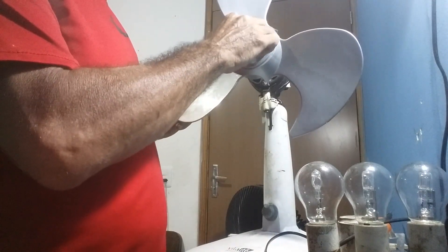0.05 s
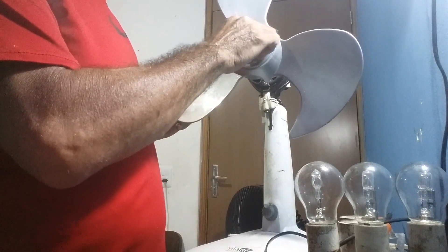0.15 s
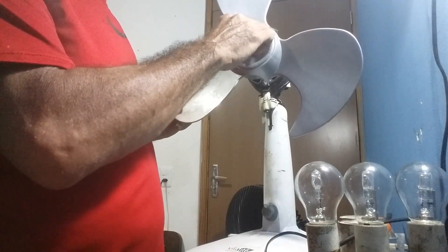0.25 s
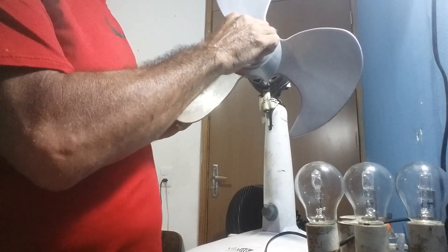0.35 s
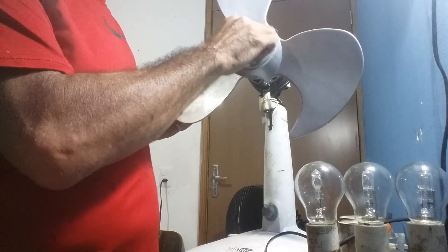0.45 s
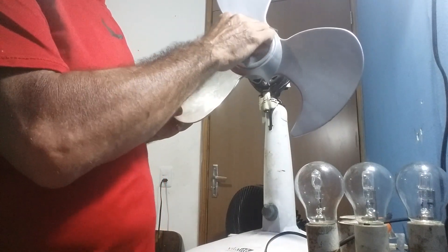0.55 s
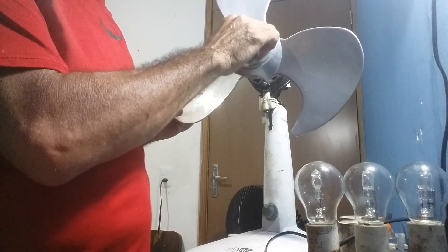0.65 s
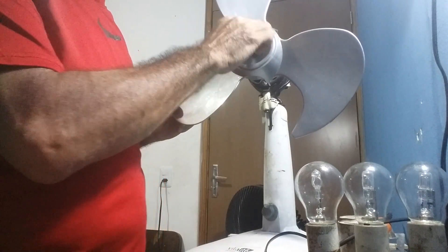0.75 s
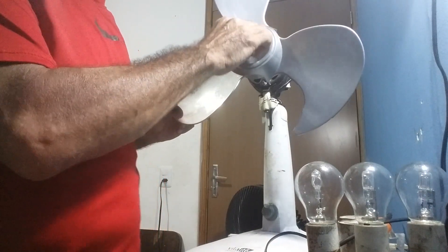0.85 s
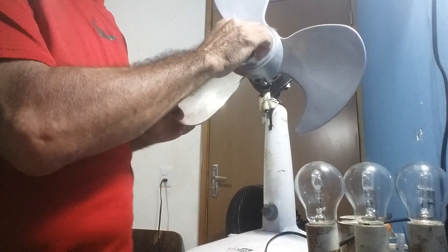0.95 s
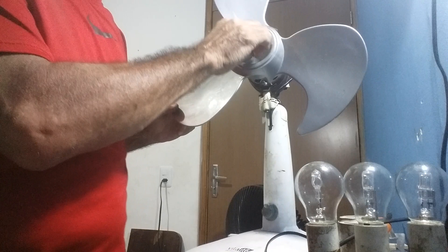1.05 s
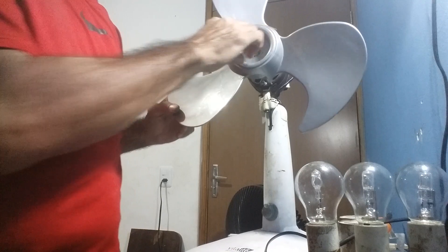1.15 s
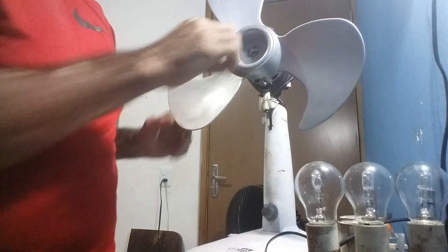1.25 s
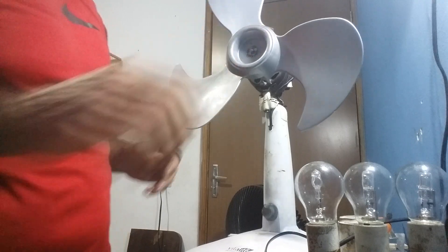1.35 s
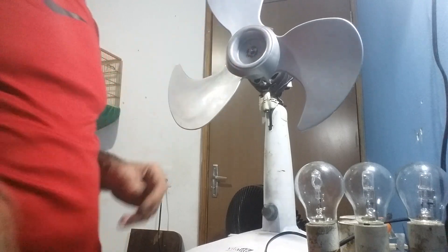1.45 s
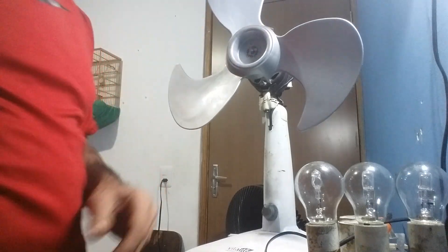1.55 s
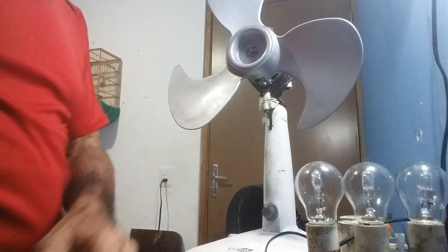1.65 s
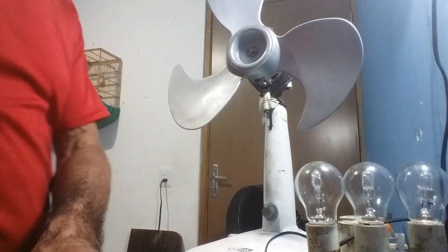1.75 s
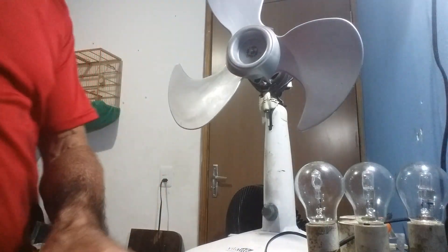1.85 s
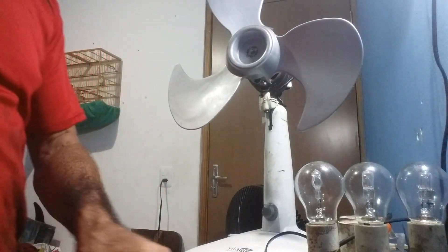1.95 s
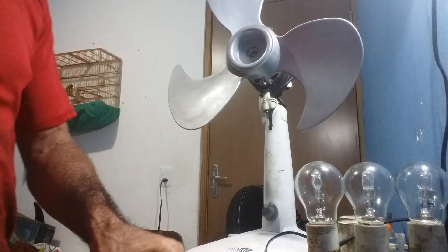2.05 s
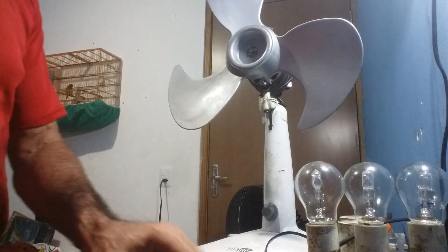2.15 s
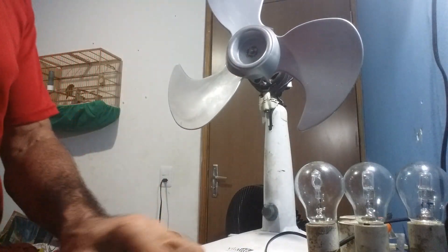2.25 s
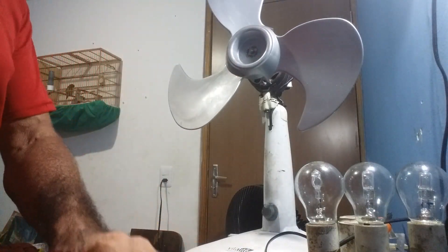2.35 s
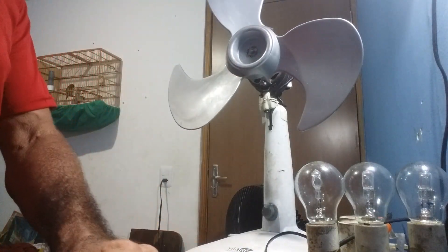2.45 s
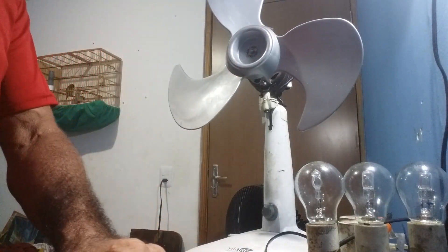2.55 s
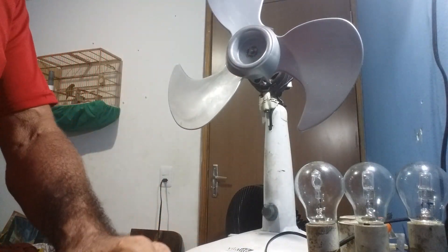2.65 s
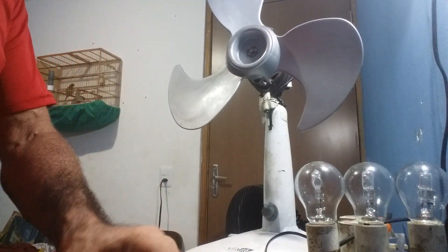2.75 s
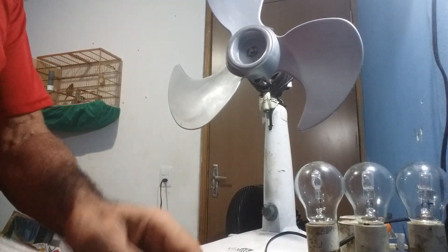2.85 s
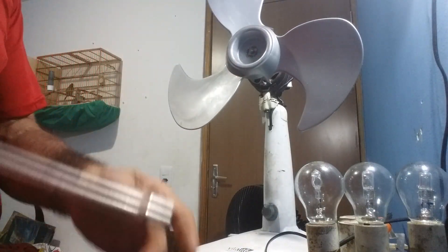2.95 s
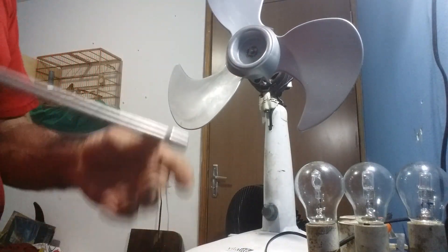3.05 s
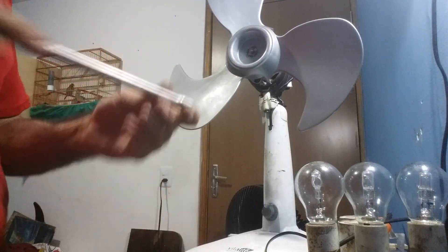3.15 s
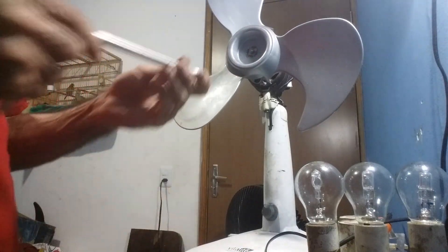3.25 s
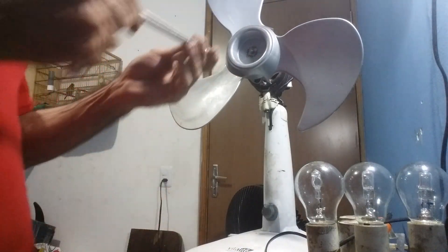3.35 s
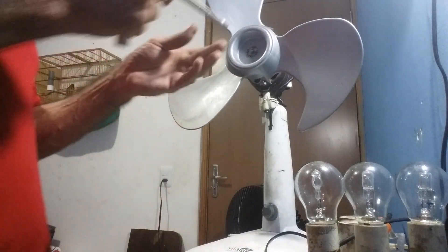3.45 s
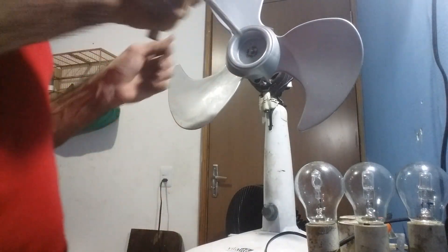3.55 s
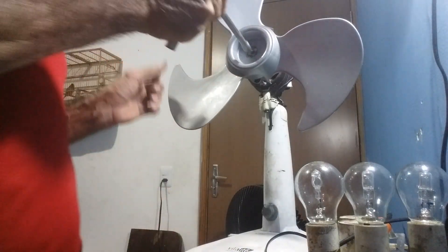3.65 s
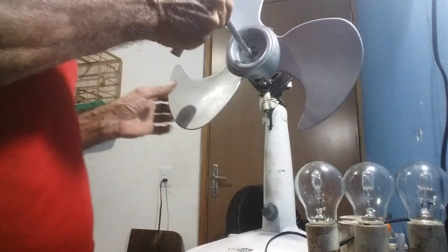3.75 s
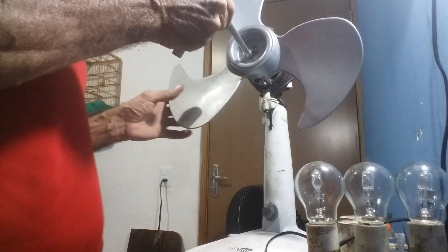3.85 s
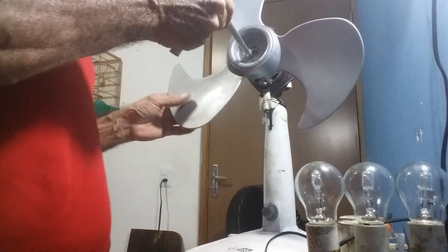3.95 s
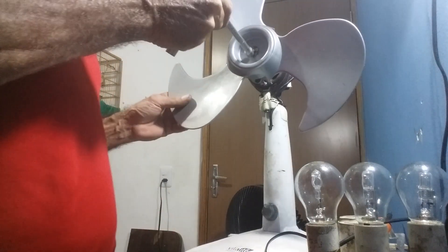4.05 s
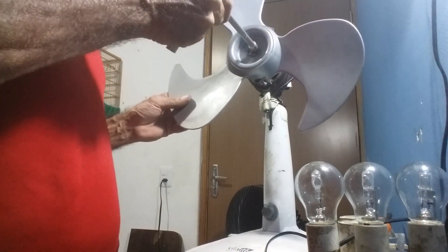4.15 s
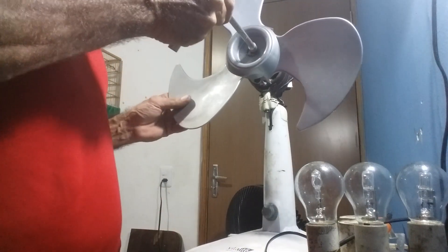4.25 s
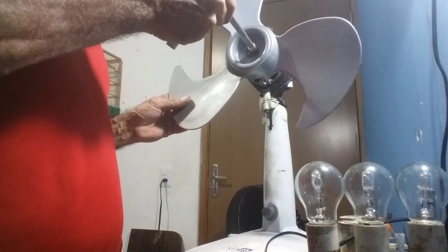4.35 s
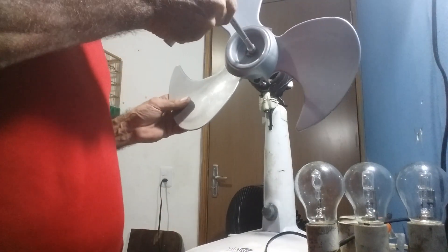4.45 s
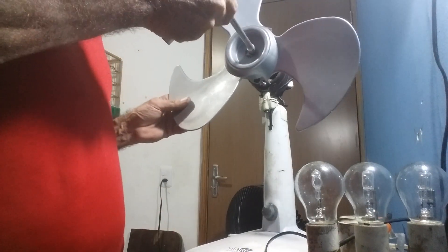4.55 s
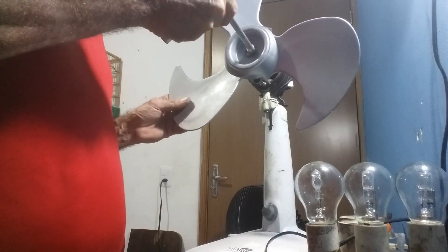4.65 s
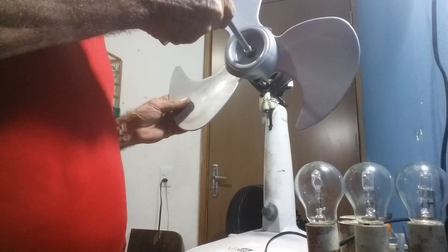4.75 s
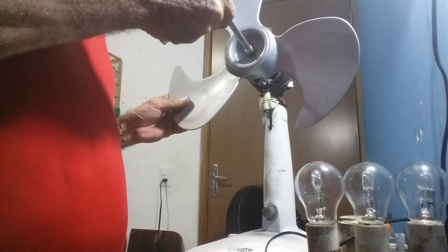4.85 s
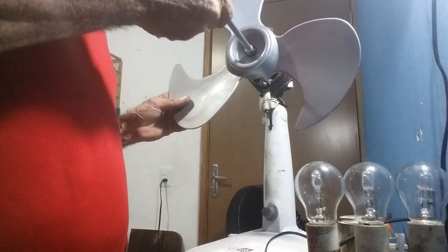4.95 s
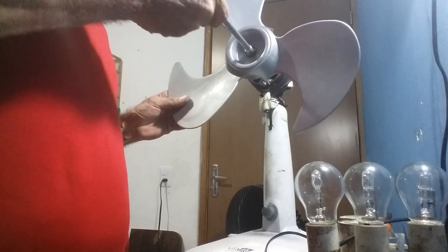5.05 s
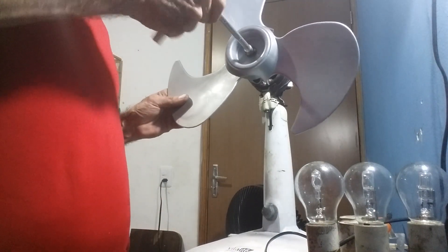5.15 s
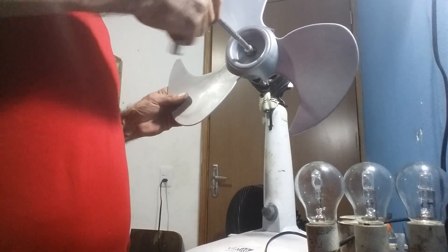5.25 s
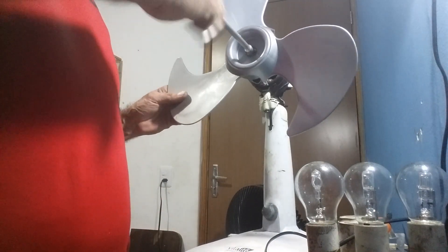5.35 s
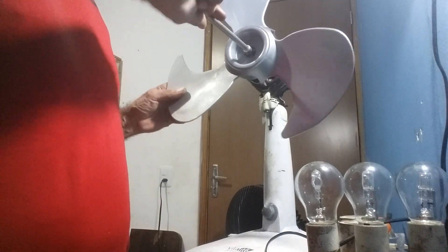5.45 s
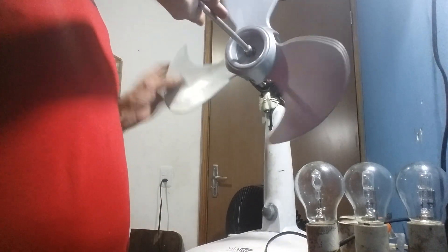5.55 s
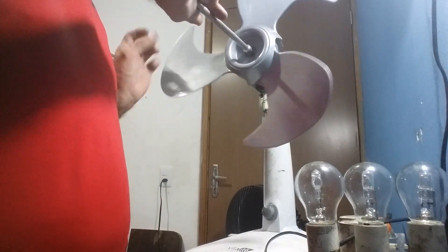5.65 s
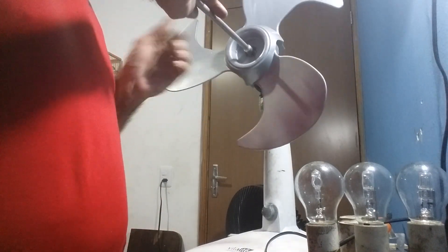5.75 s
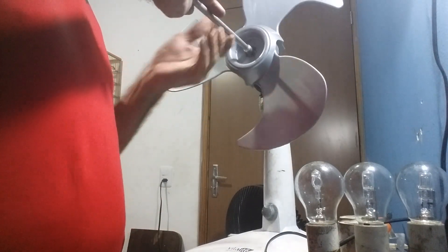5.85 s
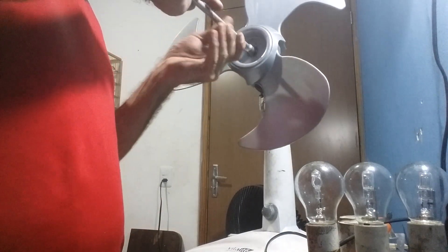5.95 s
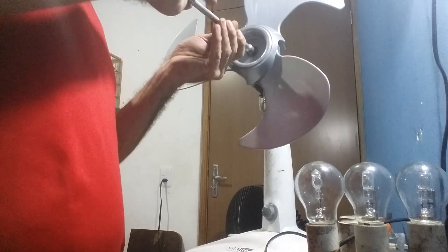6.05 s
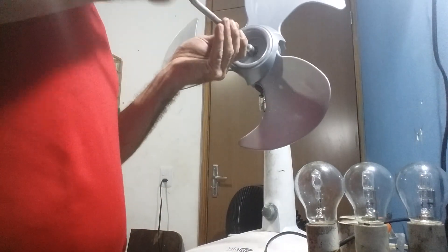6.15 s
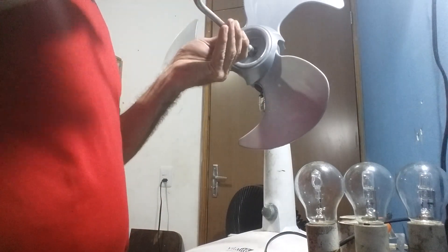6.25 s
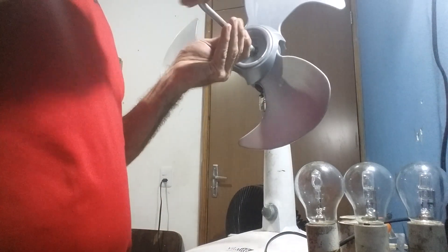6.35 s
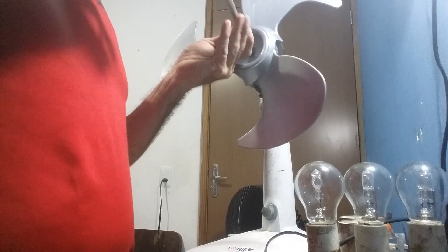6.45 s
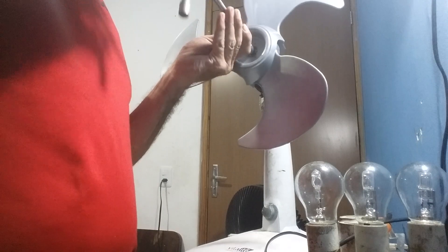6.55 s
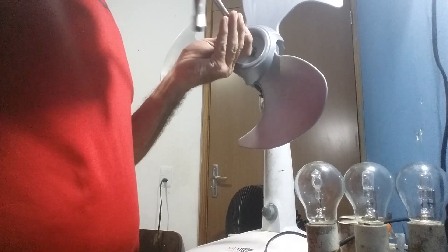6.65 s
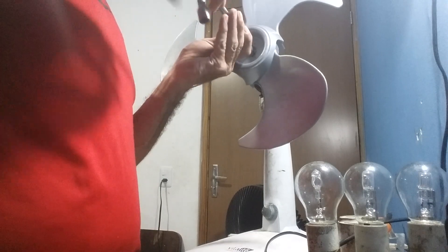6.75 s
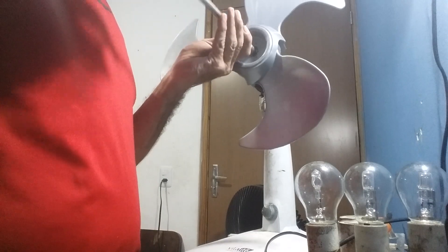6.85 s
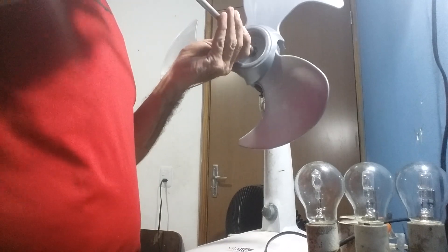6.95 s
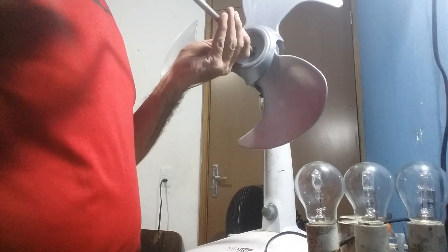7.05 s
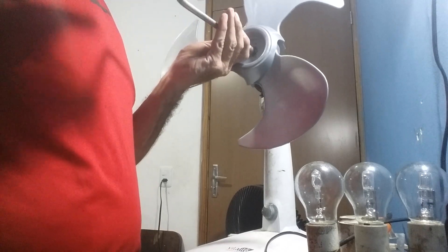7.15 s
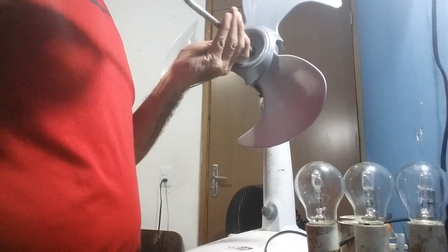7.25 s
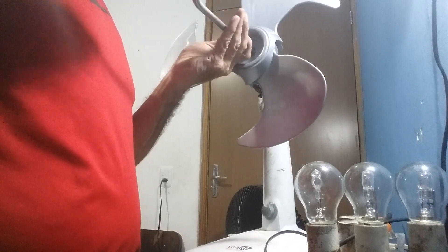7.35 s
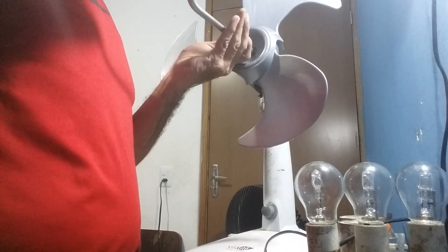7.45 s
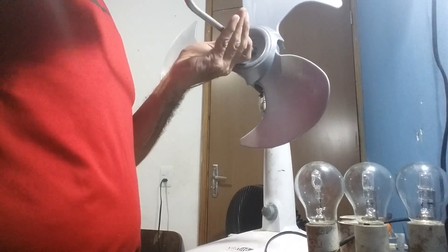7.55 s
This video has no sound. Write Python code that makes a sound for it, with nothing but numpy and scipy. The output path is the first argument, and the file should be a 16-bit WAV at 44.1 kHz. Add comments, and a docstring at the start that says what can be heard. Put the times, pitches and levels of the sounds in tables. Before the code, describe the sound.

Nearly quiet at first: low hum, slight rubbing and a small scrape. Around two seconds a tool clacks sharply, then a dense clatter of wooden and metallic knocks peaks and stops. A rod is then set into a plastic fan hub with hollow knocks, a low blade flex and repeated dry scraping. Close mono pickup in a small reverberant workshop.

```python
"""A plastic fan blade is pressed onto its motor shaft in a small, hard-walled workshop.
Hum and hiss (steady tones, filtered noise) run throughout; a hand rubs, the hub scrapes (random tiny catches)
and the stand shudders (low fading tones). Thin whistles (narrow noise) come and go from 1.2 s.
From 1.8 s tools clack, knock and drag on the bench (filtered noise and fading tones) as a metal rod is fetched.
From 3.9 s the rod knocks into the hub and pings, blades flex and scrapes return; the hiss grows from 5.1 s."""
import sys
import numpy as np
from scipy import signal
from scipy.fft import rfft, irfft
from scipy.io import wavfile
from scipy.ndimage import uniform_filter1d, minimum_filter1d

SR = 44100
rng = np.random.default_rng(int(sys.argv[2]) if len(sys.argv) > 2 else 0)


def unload_audio(sound):
    """Save the sound as a 16-bit wav file, at the path given as the first command line argument."""
    columns = np.transpose(np.atleast_2d(sound))
    # keep every value between -1 and 1, then stretch to whole-number steps
    steps = np.round(np.clip(columns, -1, 1) * 32767)
    wavfile.write(sys.argv[1], SR, steps.astype(np.int16))


N = 335160
T = np.arange(N) / SR  # time in seconds

# Event levels are mixing levels: tone shaping and the room still act on them.
# Mains hum: f/Hz, rms level/dB
HUM = [(60, -68), (120, -60.5), (240, -67.5)]
# Tone of the room air: f/Hz, level per Hz/dB
AIR_TONE = [(25, -23), (55, -17.5), (90, -7.5), (130, -5.5), (230, -8), (400, -13.5), (800, -20),
            (1500, -24.5), (3000, -28), (4500, -34.5), (7000, -41.5), (15500, -41.5)]
AIR_DB = -62
# A narrow hiss near 3 kHz grows louder once, and stays
HISS_DB, HISS_STEP_DB, HISS_STEP_S, HISS_RISE_S = -78, 7, 5.13, 0.85

# Hand sliding over plastic and rod: t/s, length/s, level/dB, hardness/dB
HAND_RUBS = [(0, 0.052, -68, 9), (.2, 0.16, -67, -3), (.565, .046, -76, 7), (0.841, 0.044, -69.5, 2),
             (1.153, 0.035, -66.5, 14), (1.226, 0.3, -70.5, 9), (3.146, 0.47, -72, 21),
             (5.436, 0.083, -59.5, 26)]
HAND_BASS_DB, HAND_TREBLE_DB = 12.5, 10.5
# Hub grinding on its shaft as it is pushed or turned: t/s, length/s, level/dB, bass/dB
SCRAPES = [(0.312, 0.031, -54.5, 2), (4.72, 0.09, -57.5, 14.5), (5.233, 0.25, -59.5, 18),
           (5.688, 0.038, -60.5, 8.5), (5.938, 0.14, -66.5, 21.5), (6.11, 0.2, -61, 20),
           (6.434, .19, -60, 11.5), (6.598, .12, -54.5, 17), (6.869, 0.12, -58, 14),
           (7.278, 0.064, -60.5, 14.5)]
SCRAPE_TREBLE_DB, SCRAPE_EDGE_DB = -5.5, 2
SCRAPE_RING_DB = -6  # the rod sings along
# Dense ring of blades, hub and motor housing: f/Hz, level per Hz/dB
FAN_TONE = [(60, -28), (130, -13.5), (280, 4.5), (420, 1.5), (700, 1), (1250, -0.5), (2000, -3.5),
            (3000, -14), (3700, -16), (4600, -13.5), (6200, -30), (9000, -38), (15000, -48)]
# Strongest rings of the fan: f/Hz, level/dB, t60/s (time to fade by 60 dB)
FAN_MODES = [(125.5, -10, 0.38), (293, -5.5, 0.064), (511, -8, 0.12), (706.4, 4.5, 0.042),
             (1031, -13.5, 0.35), (1183, -19, 0.54), (1272, -13.5, 0.27), (1622, -6.5, 0.12),
             (1876, -7, 0.11), (3120, -8.5, 0.035)]
# Rings of the metal rod: f/Hz, level/dB, t60/s
ROD_MODES = [(1565, -17, 0.08), (1750, -11, 0.09), (1867, 3, .05), (1940, -2, 0.069), (2004, -4, 0.04),
             (2900, -1.5, 0.027), (3130, -5.5, 0.026)]

# Stand and bench shuddering when leaned on: t/s, level/dB
SHUDDERS = [(0.601, -56), (0.862, -49), (0.928, -48), (1.218, -47.5), (2.551, -40), (2.719, -42),
            (5.27, -44), (6.021, -53), (6.691, -41.5)]
# Thin whistles: t/s, length/s, level/dB
WHISTLES = [(1.24, 0.93, -76), (2.934, 0.6, -74), (4.595, 0.85, -79.5)]
WHISTLE_HZ = 4750

# Small hard tools clacking: t/s, level/dB, bass/dB, hardness/dB
CLACKS = [(1.779, -51.5, 4, 12), (2.0927, -29, 4, -11), (2.144, -41, 0, -7), (2.2145, -39.5, 3, -0.5),
          (2.272, -50, 9.5, 19.5), (2.306, -47, 19.5, 20), (2.363, -57, 7.5, 25.5),
          (2.398, -59.5, 8.2, 26.5)]
# Dense ring of a small tool: f/Hz, level per Hz/dB
TOOL_TONE = [(80, -21), (400, -13.5), (750, -4), (1100, -7), (2000, -3), (3000, -0.5), (4000, -12.5),
             (5500, -25), (8000, -47), (15000, -55.5)]
# Very short rings of a small tool: f/Hz, level/dB, t60/s
CLACK_MODES = [(740, -4.5, .03), (1750, -2.5, 0.02), (2120, -3, 0.019), (2500, 0, 0.019),
               (3101, 0.5, 0.035), (3455, -7.5, 0.017), (4300, -8, 0.017)]
# Heavy tools knocking on the bench and each other: t/s, level/dB, bass/dB, hardness/dB
KNOCKS = [(1.7975, -31.5, 4, -17), (2.246, -40.5, 7, -3.5), (2.298, -38, 1.5, 10.5),
          (2.430, -41.5, 14, -0.5), (2.498, -38.5, 14, 0.5), (2.548, -21, 6.5, 2.5), (2.584, -26.5, 8, 13),
          (2.596, -28.5, 3, 18.5), (2.613, -28.5, -1.5, 13), (2.6443, -26.5, -7, 14.5),
          (2.7195, -11.5, -8, -2.5), (2.766, -20, -2.5, 9), (2.7905, -24, -6.5, 8.5),
          (2.818, -28.5, -4, -6), (3.1272, -30.5, -1.5, -8), (3.2585, -33, -1, -21.5),
          (3.326, -38.5, 4.5, -9)]
# Dense ring of the bench: f/Hz, level per Hz/dB
BENCH_TONE = [(60, -40.5), (110, -2.5), (170, 1), (260, 2.5), (700, 2), (1150, -0.5), (1600, -9.5),
              (2500, -11.5), (4200, -19), (6500, -40.5), (9500, -57.5), (15000, -69.5)]
# Strongest rings of the bench: f/Hz, level/dB, t60/s
BENCH_MODES = [(238, 3.5, 0.14), (383, -9, .2), (549.1, 7, 0.33), (706.5, -4.5, 0.23), (773, -2, 0.073),
               (853, -6.5, 0.61), (967, -8.5, 0.15), (1073, -12, .2), (1923, -9, 0.3), (2367, -3.5, 0.33)]
# Bench top bending under every knock, as far as the knock is heavy: f/Hz, level/dB, t60/s
BENCH_BENDS = [(129, -8, .18), (172, -2.5, 0.098), (231.5, 2.5, .15)]
BENCH_BEND_DB = -9
TREBLE_DB = -1.5  # of a blow of hardness 0

# A tool is dragged over the bench: the effort builds, holds, then lets go
DRAG_START_S, DRAG_BUILD_S, DRAG_END_S, DRAG_EDGE_S = 2.21, 0.29, 2.87, 0.13
DRAG_DB, DRAG_GROWTH_DB = -36, 16
# While a metal tool tumbles, it rings with each knock
TUMBLE_S, CLANG_DB = (2.52, 2.69), -5
# Rings of the tumbling tool: f/Hz, level/dB, t60/s
TOOL_MODES = [(1400, 0.5, .035), (2457, 0.5, 0.032), (2560, -5, .03), (4680, -17, 0.035)]

# Rod striking the hub: t/s, level/dB, bass/dB, hardness/dB, ping of the rod/dB
HUB_HITS = [(3.9092, -42, 9.5, -20, -66.5), (4.3079, -32, -4.5, -12.5, -40.5), (4.801, -50, 9.5, -4, -54),
            (4.888, -47.5, 6, 2, -46), (5.222, -50, 15.5, 3, -68), (5.247, -48.5, 20, 29.5, -54.5),
            (6.635, -55.5, 15.5, -22, -73), (7.038, -60.5, 8, 1, -58)]
# A blade flexes under the hand, at a pitch set by the grip: t/s, level/dB, f/Hz
FLEXES = [(3.912, -40.5, 291), (5.247, -31.5, 293), (6.031, -55.5, 358), (6.185, -55.5, 472),
          (6.632, -44, 344)]
# Bending of a blade: multiple of that pitch, level/dB, t60/s
BLADE_BENDS = [(.5, -18, 0.26), (1, 4, 0.08), (1.6, -7.5, 0.14)]

# First reflections from the bench top and near walls: delay/s, level/dB
ECHOES = [(.0023, -13.5), (.0062, -14), (0.0117, -6), (0.02, -9.5)]
# Reverberation: f/Hz, t60/s
ROOM = [(100, 0.28), (400, 0.47), (1200, 0.44), (3000, 0.49), (6000, 0.47), (14000, 0.45)]
TOP_HZ = 15800  # nothing much is recorded above this


def undb(db):
    """Turn decibels into a gain."""
    return 10 ** (np.asarray(db) / 20)


def unit(x):
    """Scale to rms 1."""
    return x / np.sqrt(np.mean(x ** 2))


def along(points, hz):
    """Read (Hz, value) points on a log-frequency axis."""
    f, value = np.transpose(points)
    return np.interp(np.log(np.maximum(hz, 1)), np.log(f), value)


def colour(x, points, size=4096):
    """Filter with the given (Hz, dB) outline, never sounding ahead of its input."""
    gains = undb(along(points, np.fft.rfftfreq(size, 1 / SR)))
    # folding the cepstrum makes the filter minimum phase
    cepstrum = irfft(np.log(gains))
    cepstrum[1:size // 2] *= 2
    cepstrum[size // 2 + 1:] = 0
    response = irfft(np.exp(rfft(cepstrum)))
    return signal.fftconvolve(x, response)[:len(x)]


def band(hz, width):
    """Narrow noise of rms 1."""
    f = np.fft.rfftfreq(N, 1 / SR)
    window = np.exp(-.5 * ((f - hz) / width) ** 2)
    return unit(irfft(rfft(rng.standard_normal(N)) * window, N))


def fade(t, t60):
    """Exponential decay, 60 dB in t60 seconds."""
    return np.exp(-np.log(1000) * t / t60)


def add(out, s, x):
    """Mix x into out from time s."""
    i = max(int(s * SR), 0)
    out[i:i + len(x)] += x[:len(out) - i]


def punch(x):
    """Scale a blow to the energy of 25 ms at rms 1."""
    return x / np.sqrt(np.sum(x ** 2) / (.025 * SR))


def ring(modes):
    """Half a second of fading modes; each blow lands elsewhere and weights them anew."""
    t = T[:SR // 2]
    rings = np.zeros(len(t))
    for hz, db, t60 in modes:
        weight = undb(db + 2 * rng.standard_normal()) * rng.choice([-1, 1])
        rings += weight * np.sin(2 * np.pi * hz * t) * fade(t, t60)
    # the contact lasts a moment, which rounds the start of the ring
    return unit(signal.sosfilt(signal.butter(4, 4800, fs=SR, output="sos"), rings))


def body(outline, modes, ring_s, dense_db, modes_db, spread_s=0.013):
    """Answer to a blow: a crack spreading through the panel, a wash of crowded modes, a few clearer rings."""
    t = T[:SR // 2]
    click = unit(1. * (t == 0))
    spread = unit(rng.standard_normal(len(t)) * fade(t, spread_s))
    crack = unit(click + undb(1.5) * spread)
    wash = unit(rng.standard_normal(len(t)) * fade(t, ring_s))
    dense = unit(colour(crack + undb(dense_db) * wash, outline))
    return punch(dense + undb(modes_db) * ring(modes))


def contact(x, bass_db, treble_db, edge_db):
    """A heavy contact adds bass, a hard one treble, a sharp corner the very top."""
    return colour(x, [(270, bass_db), (800, 0.00033), (1200, 0.0032), (2800, treble_db),
                      (4200, treble_db), (7000, edge_db), (14000, 0.53 * edge_db)])


def friction(answer, rate, spread_db):
    """Uneven stick-slip catches, rate per second on average, ringing a body; rms 1."""
    caught = rng.random(N) < rate / SR
    direction = rng.choice([-1, 1], N)
    strength = undb(spread_db * np.minimum(rng.exponential(size=N), 3))
    return unit(signal.fftconvolve(caught * direction * strength, answer)[:N])


def stroke(grain, s, length):
    """A stretch of friction that swells and lets go."""
    part = grain[max(int(s * SR), 0):][:SR]
    return part * np.sin(np.pi * np.minimum(T[:len(part)] / length, 1))


def background():
    """Mains hum as steady tones, room air as shaped noise and a narrow hiss."""
    hum = np.zeros(N)
    for hz, db in HUM:
        hum += undb(db) * np.sqrt(2) * np.sin(2 * np.pi * (hz * T + rng.random()))
    air = undb(AIR_DB) * unit(colour(rng.standard_normal(N), AIR_TONE))
    rise = np.clip((T - HISS_STEP_S) / HISS_RISE_S, 0, 1)
    hiss = undb(HISS_DB + HISS_STEP_DB * rise) * band(2955, width=280)
    return hum + air + hiss


def fan():
    """Plastic blades and hub on the motor housing."""
    return body(FAN_TONE, FAN_MODES, ring_s=0.15, dense_db=8, modes_db=-1.5)


def rubbing():
    """Short strokes on the plastic: skin hisses, the hub grinds low and sets the rod ringing."""
    out = np.zeros(N)
    grain = friction(fan(), rate=1900, spread_db=6.5)
    singing = undb(SCRAPE_RING_DB) * friction(ring(ROD_MODES), rate=250, spread_db=8)
    for s, length, db, hard_db in HAND_RUBS:
        rub = contact(stroke(grain, s, length), HAND_BASS_DB, HAND_TREBLE_DB, hard_db)
        add(out, s, undb(db) * rub)
    for s, length, db, bass_db in SCRAPES:
        scrape = contact(stroke(grain + singing, s, length), bass_db, SCRAPE_TREBLE_DB, SCRAPE_EDGE_DB)
        add(out, s, undb(db) * scrape)
    return out


def shudders(hz=60, t60=0.22, rise_s=0.023):
    """Low, quickly damped sway of stand and bench, each at a slightly different pitch."""
    out, t = np.zeros(N), T[:SR // 2]
    for s, db in SHUDDERS:
        pitch = hz * (1 + 0.027 * rng.standard_normal())
        sway = np.sin(2 * np.pi * pitch * t) * fade(t, t60) * (1 - np.exp(-t / rise_s))
        add(out, s, 2 * undb(db) * sway)
    return out


def whistles():
    """Faint, wavering high notes: narrow noise that swells and sinks."""
    swell = np.zeros(N)
    for s, length, db in WHISTLES:
        swell += undb(db) * np.sin(np.pi * np.clip((T - s) / length, 0, 1))
    return swell * band(WHISTLE_HZ, width=130)


def tool():
    """Small hard tool, dead almost at once."""
    return body(TOOL_TONE, CLACK_MODES, ring_s=.022, dense_db=3, modes_db=-5, spread_s=.01)


def bench():
    """Wooden bench with loose tools on it."""
    return body(BENCH_TONE, BENCH_MODES, ring_s=0.087, dense_db=4.0, modes_db=-11.5)


def blows(table, answer, treble_share, room_db):
    """Strike a body; hardness lifts the top and a share of it the treble. Gives direct sound and room feed."""
    out = np.zeros(N)
    for s, db, bass_db, hard_db, *_ in table:
        treble_db = TREBLE_DB + treble_share * hard_db
        add(out, s, undb(db) * contact(answer(), bass_db, treble_db, hard_db))
    return np.array([out, undb(room_db) * out])


def bend(modes, pitch=1, rise_s=0.0071):
    """Low bending modes, pushed softly so that they swell before they fade."""
    t = T[:SR // 2]
    sway = np.zeros(len(t))
    for f, db, t60 in modes:
        sway += undb(db) * np.sin(2 * np.pi * pitch * f * t) * fade(t, t60)
    return punch(sway * (1 - np.exp(-t / rise_s)))


def flexes():
    """Thuds of the bench top under the knocks and of the blades under the hand."""
    out = np.zeros(N)
    for s, db, bass_db, _ in KNOCKS:
        add(out, s, undb(db + bass_db + BENCH_BEND_DB) * bend(BENCH_BENDS))
    for s, db, hz in FLEXES:
        add(out, s, undb(db) * bend(BLADE_BENDS, hz))
    return out


def dragging():
    """A tool judders over the bench: many small catches ring the wood."""
    catches = friction(bench(), rate=1100, spread_db=-1.0)
    grain = contact(catches, bass_db=6.5, treble_db=-3, edge_db=2.5)
    effort = np.clip((T - DRAG_START_S) / DRAG_BUILD_S, 0, 1)
    touching = np.clip(np.minimum(T - DRAG_START_S, DRAG_END_S - T) / DRAG_EDGE_S, 0, 1)
    return grain * touching * undb(DRAG_DB - DRAG_GROWTH_DB * (1 - effort))


def metal(table, modes):
    """Short, hand-damped metal rings."""
    out = np.zeros(N)
    for s, db in table:
        add(out, s, undb(db) * punch(ring(modes)))
    return out


def room(x, build_s=0.0055, tail_db=-1):
    """Close bare walls: a few dull reflections and a dense tail whose deepest part dies soonest."""
    t = T[:SR]
    # fade noise at its own speed in each frequency band
    f, when, cells = signal.stft(rng.standard_normal(SR), SR, nperseg=256)
    cells = cells * fade(when, along(ROOM, f)[:, None])
    tail = signal.istft(cells, SR)[1][:SR] * (1 - np.exp(-t / build_s))
    tail = tail / np.sqrt(np.sum(tail ** 2))
    early = np.zeros(SR)
    for s, db in ECHOES:
        add(early, s, undb([db]))
    early = colour(early, [(1200, -3.5), (4000, -5.5)])
    return signal.fftconvolve(x, early + undb(tail_db) * tail)[:N]


def scene():
    """Blows, rings and scrapes in the room, over the background."""
    knocks = blows(KNOCKS, bench, treble_share=.48, room_db=-6.5)
    clacks = blows(CLACKS, tool, treble_share=.03, room_db=-5.5)
    hub_hits = blows(HUB_HITS, fan, treble_share=0.46, room_db=-0.9)
    direct, sent = knocks + clacks + hub_hits
    scrapes = rubbing() + dragging()
    pings = [(s, ping_db) for s, *_, ping_db in HUB_HITS]
    clangs = [(s, db + CLANG_DB) for s, db, *_ in KNOCKS if TUMBLE_S[0] < s < TUMBLE_S[1]]
    rings = metal(pings, ROD_MODES) + metal(clangs, TOOL_MODES)
    thuds = flexes()
    walls = room(sent + undb(-8) * thuds + undb(-6) * scrapes + undb(-2.5) * rings)
    events = direct + undb(-2) * scrapes + rings + thuds + walls
    return (events + shudders() + whistles() + background())[None]  # one channel


def record(dry):
    """The recorder cuts the deepest bass, holds down peaks with a quick limiter, then cuts the top."""
    ceiling, span = .9, 220  # full scale is 1; span in samples, about 5 ms
    x = signal.sosfilt(signal.butter(3, 42, "highpass", fs=SR, output="sos"), dry)
    needed = ceiling / np.maximum(np.abs(x), ceiling)
    gain = uniform_filter1d(minimum_filter1d(needed, span), span)
    return signal.sosfilt(signal.ellip(10, .2, 70, TOP_HZ, fs=SR, output="sos"), x * gain)


dry = scene()
out = record(dry)
unload_audio(out)
```